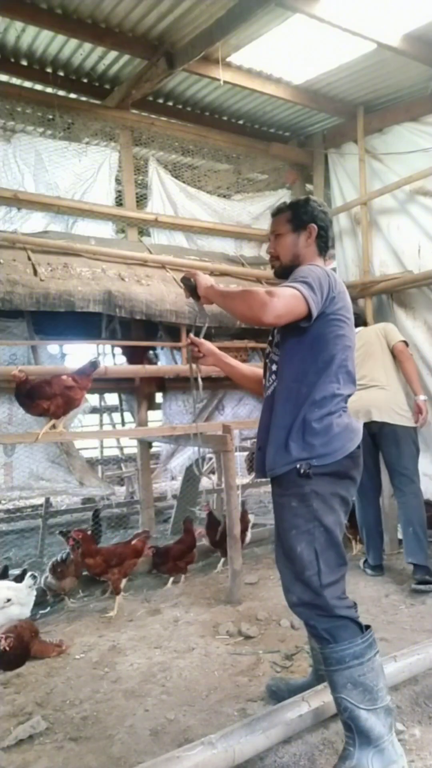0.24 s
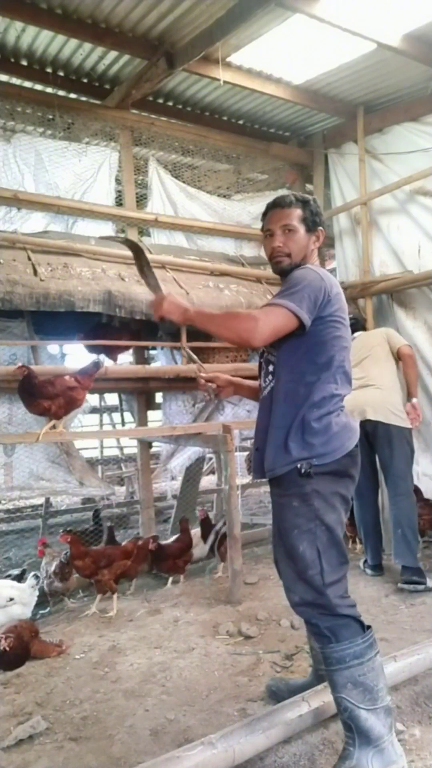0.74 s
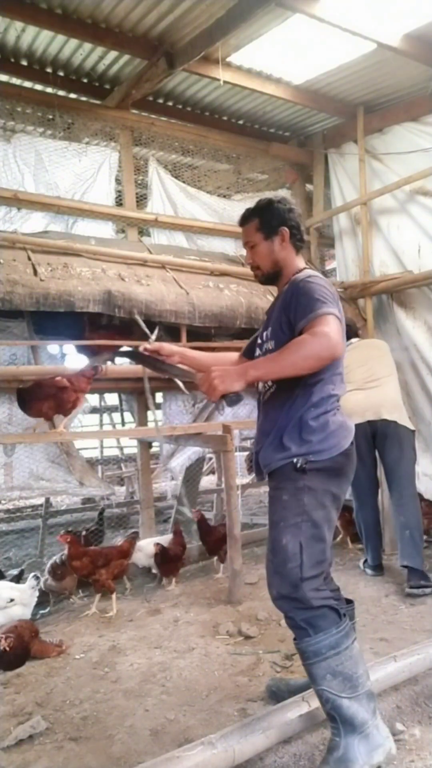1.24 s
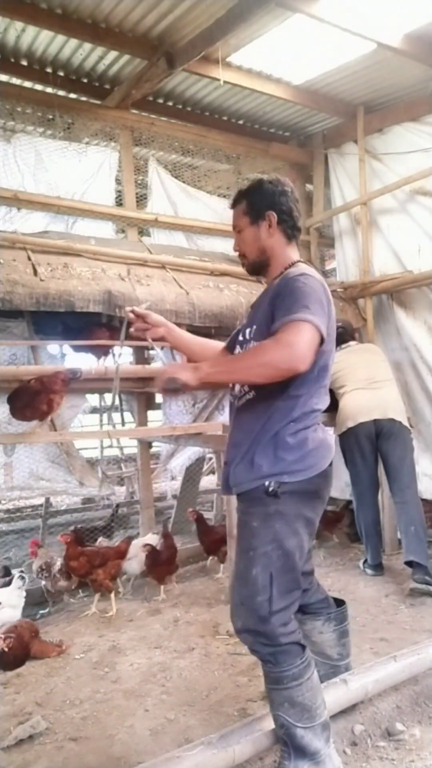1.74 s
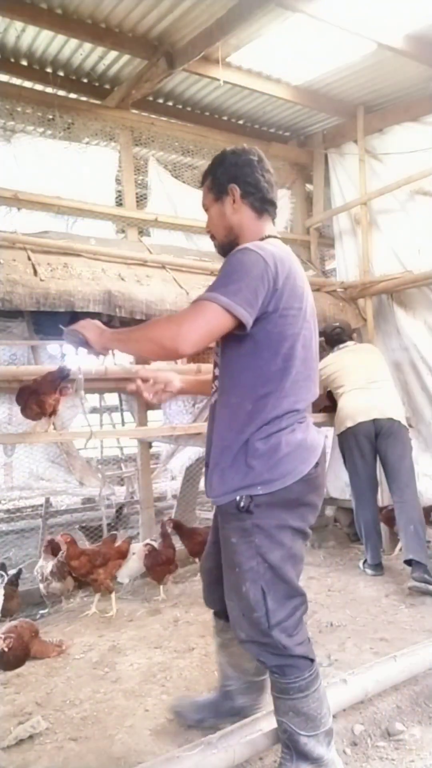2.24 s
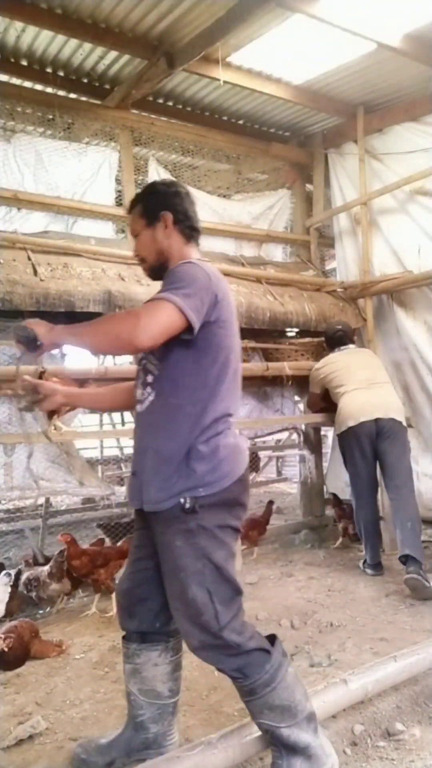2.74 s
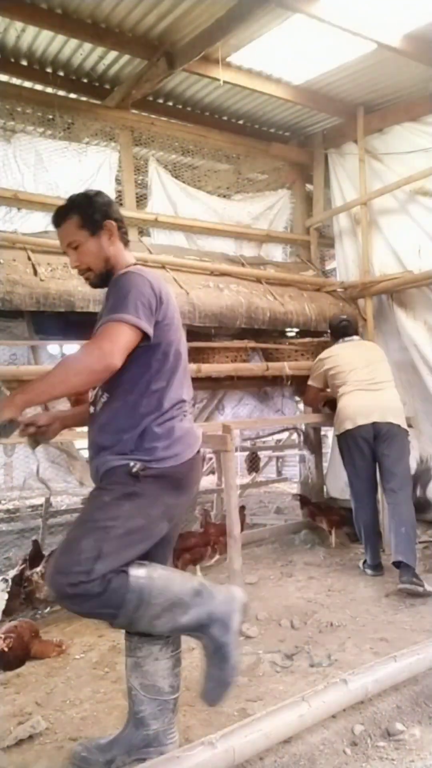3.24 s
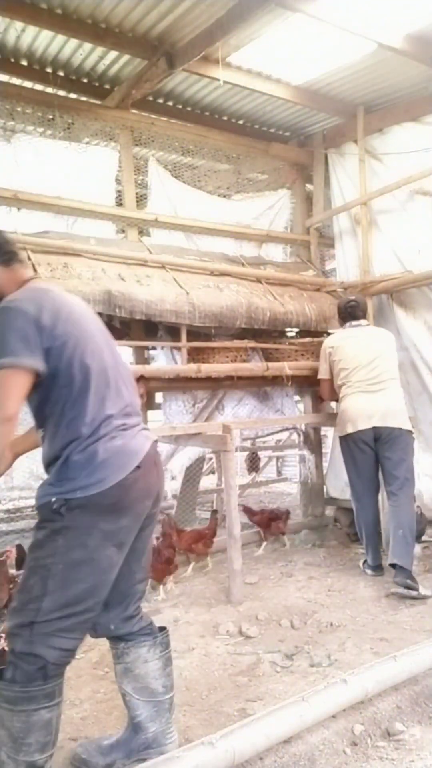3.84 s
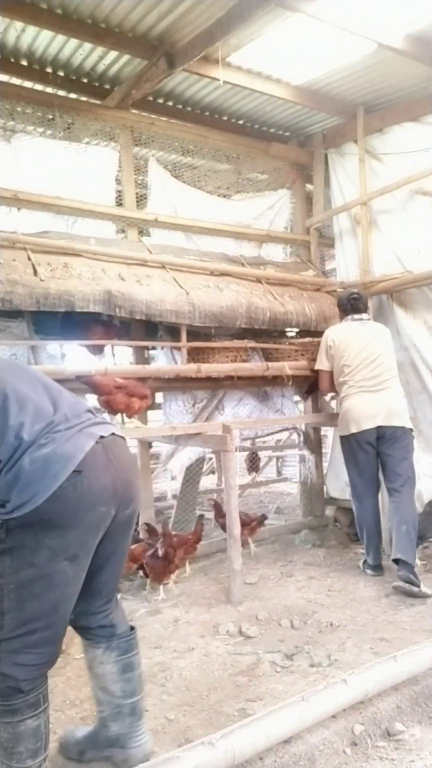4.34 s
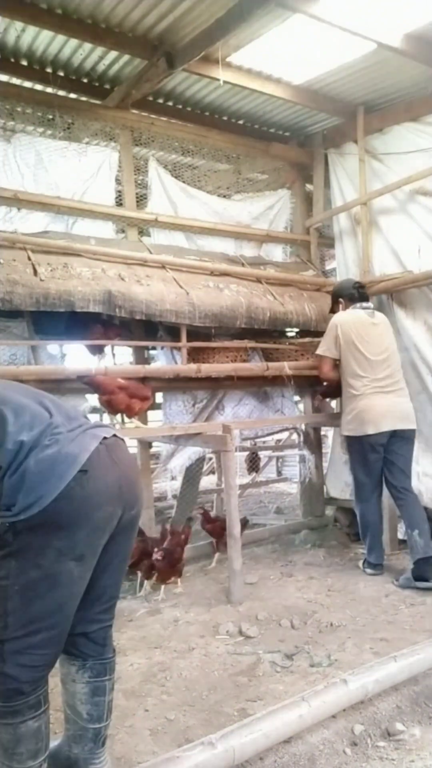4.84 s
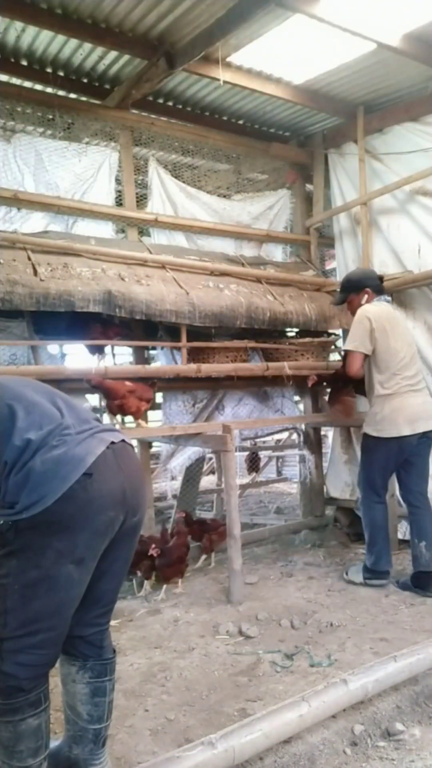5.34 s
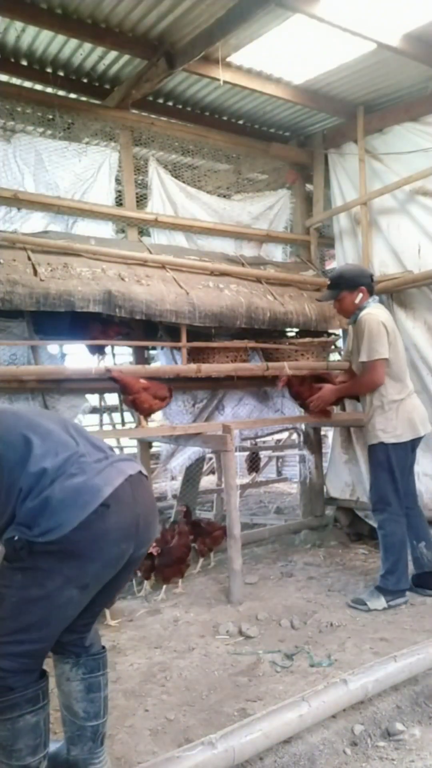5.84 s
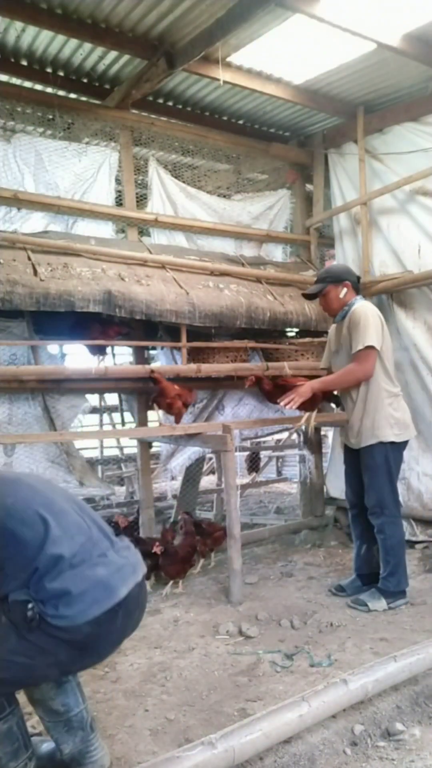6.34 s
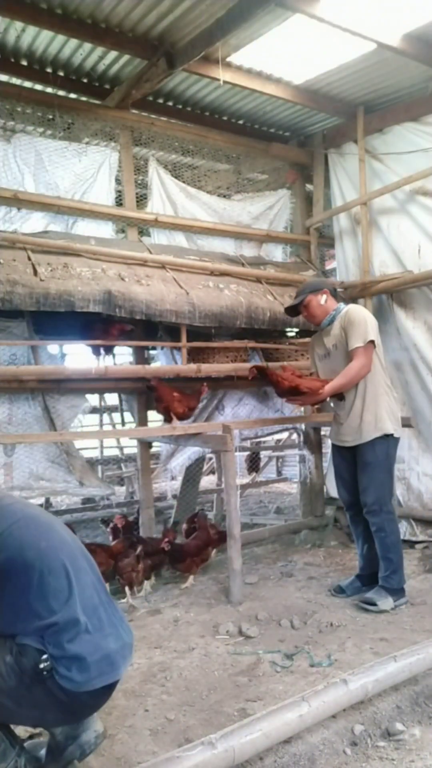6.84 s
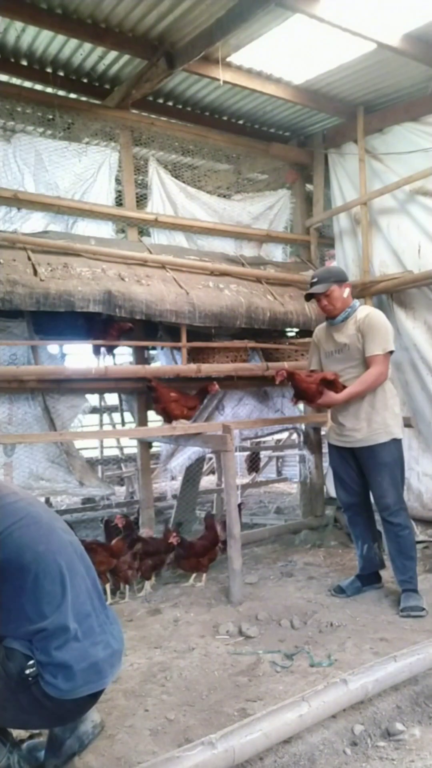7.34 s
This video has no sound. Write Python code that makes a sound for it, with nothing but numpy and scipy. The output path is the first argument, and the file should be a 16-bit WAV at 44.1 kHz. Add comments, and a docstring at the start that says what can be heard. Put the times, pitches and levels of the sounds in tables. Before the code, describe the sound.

A phone inside a small sheet-roofed chicken pen picks up a brief rustle and mixed low clucks. A held hen suddenly gives a rattling, rising squawk and a quick run of raspy cries, while wings and boots knock, slap and scuffle in dry litter. She follows with several clearer, strained calls, then calms as the flock clucks gently with tiny high peeps.

```python
"""Close in a bamboo hen shed under a sheet roof, on a phone: still air, litter rustling, the flock clucking,
with thin whines and chick peeps. From 2 s one caught hen squawks, hoarse at first, amid knocks of wings and
boots, slaps, rustle and scuffling; from 3.3 s she calls more clearly, and after 5.4 s she and the flock cluck on.
Voices are pulses and breath through throat and beak, whines and peeps wavering tones, blows decaying tones
and noise, air and litter coloured noise; the voices and blows also ring in the shed."""
import sys
import numpy as np
from scipy import signal
from scipy.fft import rfft, irfft, next_fast_len
from scipy.io import wavfile
from scipy.ndimage import map_coordinates

SR = 44100
rng = np.random.default_rng(int(sys.argv[2]) if len(sys.argv) > 2 else 0)


def waveform_to_disk(signal):
    """Save audio, clipped to [-1, 1], as 16-bit WAV at the path in sys.argv[1]."""
    frames = np.transpose(np.atleast_2d(signal))
    scaled = np.clip(frames, -1, 1) * 32767
    samples = np.round(scaled).astype(np.int16)
    wavfile.write(sys.argv[1], SR, samples)


N = 334278

# spectrum of dry leaves, twigs and litter: f/Hz, level/dB
LEAF_SPECTRUM = [(880, -32), (1500, 1), (3090, 4.5), (6690, 6.5), (16000, 0.5)]
# spectrum of dull blows and scuffling: f/Hz, level/dB
RUMBLE_SPECTRUM = [(29, -48), (50, -9), (84, -5), (161, -6), (450, -5), (580, -4), (990, -120)]
# throat response with the beak nearly shut: f/Hz, level/dB
SHUT_THROAT = [(250, -35.5), (420, -7), (700, -1), (1300, -5), (1800, -11), (2400, -27), (3500, -36.5),
               (6000, -69)]


def amp(db):
    """Amplitude factor of a level in dB."""
    return 10 ** (np.asarray(db) / 20)


def unit(x):
    """Scales to rms 1."""
    return x / np.sqrt(np.mean(x ** 2) + 1e-20)


def along(points, hz):
    """Reads (f/Hz, value) points on a log frequency axis."""
    f, v = np.transpose(points)
    return np.interp(np.log(hz + 1), np.log(f + 1), v)


def span(rows):
    """Start time, and one value per sample for each column after the time."""
    s, *cols = np.transpose(rows)
    t = np.arange(s[0], s[-1], 1 / SR)
    return s[0], [np.interp(t, s, c) for c in cols]


def add(track, s, x):
    """Mixes x into the track at s seconds."""
    part = track[round(s * SR):][:len(x)]
    part += x[:len(part)]


def faded(x, fade_s=0.003):
    """Soft ends, so that nothing clicks."""
    t = np.arange(len(x)) / SR
    return x * np.clip(np.minimum(t, t[::-1]) / fade_s, 0, 1)


def wobble(size, rate):
    """A smooth random curve through rate knots a second."""
    knots = rng.standard_normal(int(size * rate / SR) + 4)
    return map_coordinates(knots, [np.arange(size) * rate / SR])


def filtered(x, response):
    """Multiplies the spectrum of x by a response, a function of frequency in Hz."""
    m = next_fast_len(x.shape[-1] + 4096)  # room for the filter to ring
    spectrum = rfft(x, m) * response(np.fft.rfftfreq(m, 1 / SR))
    return irfft(spectrum, m)[..., :x.shape[-1]]


def noise(spectrum, size):
    """Coloured noise of rms 1."""
    return unit(filtered(rng.standard_normal(size), lambda hz: amp(along(spectrum, hz))))


def shed_noise():
    """One channel of still air, a slowly wavering noise, with litter rustling in random grains over it."""
    # still air of the shed: f/Hz, level/dB
    air_spectrum = [(300, -37), (1500, -11.5), (6300, -15.5), (16000, -26)]
    # passages of rustle, one list each: t/s, level/dB
    rustle = [
        [(0, -45), (.2, -45.5), (.42, -40.5), (.475, -32), (.68, -92)],
        [(2.4, -77), (2.75, -37), (3.05, -31.5), (3.3, -32.5), (3.6, -56)],
    ]
    out = amp(-55.5 + 2.5 * wobble(N, 7)) * noise(air_spectrum, N)
    for rows in rustle:
        s, (db,) = span(rows)
        size = len(db)
        grains = amp(4.5 * wobble(size, 40) + 3 * wobble(size, 400))
        litter = unit(grains * noise(LEAF_SPECTRUM, size))
        add(out, s, faded(amp(db) * litter, 0.0014))
    return out


def scuffle():
    """Feet and wings as a low lumpy rumble, and the hens at the far end as a soft noise of throats."""
    # t/s, level of feet and wings/dB, level of the far flock/dB
    levels = [(0, -66, -65), (2.3, -64, -56), (2.7, -42, -41.5), (3.3, -50.5, -47), (3.95, -69, -57),
              (7.58, -61.5, -62.5)]
    s, (rumble_db, flock_db) = span(levels)
    size, out = len(rumble_db), np.zeros(N)
    rumble_db = rumble_db + 3.5 * wobble(size, 12)
    flock_db = flock_db + 3.5 * wobble(size, 8) + 4 * wobble(size, 30)
    add(out, s, amp(rumble_db) * noise(RUMBLE_SPECTRUM, size))
    add(out, s, amp(flock_db) * noise(SHUT_THROAT, size))
    return out


def knocks():
    """Dull thumps of tone and rumble, and slaps: a bright crack over a short ring of hollow cane."""
    # knocks on perch and ground: t/s, level/dB, f/Hz
    thumps = [(2.395, -45.5, 163.7), (2.579, -35, 160), (2.686, -31.5, 338), (3.235, -29, 247),
              (3.272, -28, 214), (3.392, -36.5, 161.9), (3.822, -41, 166)]
    # slaps of twigs and wings: t/s, level/dB, cane against crack/dB, t60 of the crack's tail/s, cane f/Hz
    slaps = [(0.773, -37.5, 2, 0.259, 1005), (2.7008, -26, 10, 0.13, 745), (3.02, -21, -25, 0.04, 1187),
             (3.1833, -39.5, 31.5, 0.38, 1365), (3.213, -41.5, 28, .05, 1007),
             (3.8222, -31, 7.5, 0.15, 683)]
    out, t = np.zeros(N), np.arange(SR // 5) / SR
    for s, db, hz in thumps:
        push = np.sin(2 * np.pi * hz * t) + 0.9 * noise(RUMBLE_SPECTRUM, len(t))
        onset = 1 - np.exp(-t / 0.0011)
        add(out, s, amp(db - 2.5 - 60 * t / 0.18) * onset * push)
    for s, db, cane_db, t60, cane_hz in slaps:
        decay = amp(3.5 - 60 * t / t60) + amp(-60 * t / 0.013)  # a tail and a quick snap
        crack = decay * (1 - np.exp(-t / 0.0012)) * noise(LEAF_SPECTRUM, len(t))
        cane = amp(-60 * t / 0.073) * np.sin(2 * np.pi * cane_hz * t)
        cane = cane * (1 + 0.5 * wobble(len(t), 220)) * (1 - np.exp(-t / 0.00022))
        add(out, s, amp(db - 5) * (crack + amp(cane_db) * cane))
    return out


def whistle(length_s, start_hz, end_hz, db, arch, waver_hz):
    """A wavering near-pure tone with a faint octave, its pitch arching in the middle."""
    octave_db = -24
    size = round(length_s * SR)
    bend = 1 + arch * np.sin(np.linspace(0, np.pi, size))
    pitch_hz = bend * np.linspace(start_hz, end_hz, size) + waver_hz * wobble(size, 93)
    turn = 2 * np.pi * np.cumsum(pitch_hz) / SR
    tone = np.sin(turn) + amp(octave_db) * np.sin(2 * turn)
    return faded(np.sqrt(2) * amp(db + 2.4 * wobble(size, 46.5)) * tone, 0.021)


def beak(spectrum, beak_hz, beak_db, width_hz):
    """A throat response with one resonance lifted."""
    return lambda hz: amp(along(spectrum, hz) + beak_db / (1 + ((hz - beak_hz) / width_hz) ** 2))


def voice(pitch_hz, db, treble_db, rough, shut, wide, opening):
    """Syrinx pulses through throat and beak; roughness unsettles pitch and size, and air hisses once a cycle."""
    # treble of the voice: f/Hz, level/dB
    treble_spectrum = [(1470, -17), (2500, -4.5), (3200, -3), (3700, -6), (4170, -4), (4690, -14),
                       (7020, -4.5), (11300, -14), (16000, -27)]
    doubling = 3.5  # how far strong and weak pulses alternate at full roughness
    size, rough = len(db), np.clip(rough, 0, 1)
    jitter = 0.01066 * wobble(size, 29.5) + 0.057 * rough * wobble(size, 263.7)
    turn = 2 * np.pi * np.cumsum(pitch_hz * (1 + jitter)) / SR

    # the restless throat lifts each overtone in turn
    k = np.arange(1, 21)[:, None]
    step = 1200  # samples between knots
    knots = rng.standard_normal((len(k), size // step + 2))
    at = np.arange(size) / step
    lifts_db = [5 * np.interp(at, np.arange(len(row)), row) for row in knots]
    overtones = np.cos(k * turn + 0.3 * k * k)  # spread phases: a drawn-out pulse
    pulses = unit((amp(lifts_db) * overtones).sum(axis=0))
    pulses = pulses * amp(4 * rough * wobble(size, 110))
    pulses = pulses * (1 + doubling * rough ** 2 * np.cos(turn / 2))
    air = rng.standard_normal(size) * (1 + 0.98 * np.cos(turn)) * amp(3.48 * wobble(size, 93.14))

    def mix(air_share, tract):
        """Pulses and air through one tract, shared by power."""
        tone, hiss = unit(filtered(pulses, tract)), unit(filtered(air, tract))
        return np.sqrt(1 - air_share) * tone + np.sqrt(air_share) * hiss

    body = (1 - opening) * mix(rough ** 2, shut) + opening * mix(rough ** 2, wide)
    treble = mix(np.clip(0.11 + 1.53 * rough, 0, 1), lambda hz: amp(along(treble_spectrum, hz)))
    return faded(amp(db) * (body + amp(treble_db) * treble))


def cluck(db, pitch_hz, beak_hz, swell_s, treble_db, rough):
    """One breath push: it swells and glides up, sags in pitch, roughens and dies."""
    scoop = 0.09  # share of the pitch by which the glide starts low
    t = np.arange(1, SR // 6) / SR
    u = t / max(swell_s, 0.008)
    level_db = db + 12 * (np.log(u) + 1 - u)  # peaks at u = 1
    glide_hz = pitch_hz * (1.01 - 0.412 * t - scoop * np.exp(-2 * u))
    throat = beak(SHUT_THROAT, beak_hz, 10.5, 210)
    return voice(glide_hz, level_db, treble_db, rough + 3.77 * t, throat, throat, opening=1)


def flock():
    """Nearer hens and chicks, with some soft clucks of the caught hen: breathy clucks, whistled whines and peeps."""
    # clucks: t/s, level/dB, pitch f/Hz, beak resonance f/Hz, swell/s, treble against body/dB, roughness (0-1)
    clucks = [(0.376, -44.5, 583, 1220, 0.0091, -4.5, 0.8), (0.538, -41, 306, 970, 0.0067, -25.5, 0.27),
              (0.685, -30, 453, 1010, 0.013, -16, 0.17), (0.875, -37, 574, 870, 0.01157, -28, 0.34),
              (0.936, -44, 514, 1040, 0.011, -12.5, 0.31), (1.135, -39, 631, 697, 0.013, -25, 0.77),
              (1.169, -45, 580, 1200, 0.0067, -20, 0.36), (1.251, -28, 462.5, 1400, 0.01007, -21.5, 0.37),
              (1.313, -34.5, 567, 1014, 0.023, -21.5, 0.3), (1.44, -28.5, 649.6, 1004, 0.038, -25, 0.44),
              (1.654, -31.5, 390, 910, 0.034, -28.5, 0.56), (1.744, -25.5, 524, 1150, 0.016, -23, 0.26),
              (1.859, -23.5, 687, 1462, 0.016, -18.5, 0.39), (2.432, -32, 476, 903.5, 0.024, -25.5, 0.7),
              (5.493, -32.5, 698, 1570, 0.023, -13.5, 0.52), (5.655, -39.5, 337, 880, 0.0127, -31, .5),
              (5.765, -31.5, 715.2, 1425, 0.022, -15.5, 0.31),
              (5.867, -28, 668.4, 1480, 0.025, -17.5, 0.33), (5.94, -35.5, 673, 1380, 0.029, -18, 0.54),
              (6.142, -33.5, 606, 950, 0.018, -26.5, 0.55), (6.402, -33.5, 402.6, 800, 0.026, -19.5, 0.28),
              (6.55, -43, 421.7, 1050, 0.027, -34.5, 0.5), (6.653, -27.5, 413.4, 1270, 0.01806, -23, 0.18),
              (6.773, -34.5, 400.4, 1090, 0.017, -26, 0.34), (6.919, -45, 537, 835, 0.014, -38.5, 0.73),
              (7.064, -33.5, 681, 1300, 0.02673, -24, 0.51), (7.19, -31.5, 659, 1344, 0.0169, -25.5, 0.37),
              (7.48, -31.5, 398, 1247, 0.021, -22.5, 0.37)]
    # soft whines and coos of single hens: t/s, length/s, start f/Hz, end f/Hz, level/dB, arch (share of pitch)
    whines = [(0.964, 0.037, 490, 353, -50, .04), (5.424, 0.096, 1069, 1065, -39.5, 0.066),
              (5.682, 0.057, 925.5, 1003, -44, 0.033), (6.453, 0.11, 1004, 1003, -48, 0.0214),
              (7.351, 0.15, 1015, 960, -46, .01), (7.33, .11, 799, 660, -45, .6)]
    # chick peeps: t/s, length/s, start f/Hz, end f/Hz, level/dB
    peeps = [(0.739, 0.053, 3450, 3370, -59), (0.987, 0.08, 3366, 3475, -56),
             (1.285, 0.089, 3410, 3270, -57), (6.025, 0.069, 3430, 3420, -55.5),
             (6.283, 0.119, 3470, 3436, -53), (6.609, 0.1, 3480, 3366, -50)]
    out = np.zeros(N)
    for s, *row in clucks:
        add(out, s, cluck(*row))
    for s, *row in whines:
        add(out, s, whistle(*row, waver_hz=42))
    for s, *row in peeps:
        add(out, s, whistle(*row, arch=0.0175, waver_hz=29))
    return out


def squawk(swell_s, fall_s, onset_db, peak_db, end_db, onset_hz, peak_hz, rough):
    """Pitch and level climb together to a peak, then drop; hoarse at both ends."""
    attack_s, attack_db = 0.031, -6  # the voice starts this far under the onset level
    kick_s, kick_db = 0.027, 3  # the first push overshoots and settles
    swell_curve = 1.77  # over 1: the level climbs most near the peak
    fall_curve, sag = 0.453, 0.08  # under 1: the level drops most at first; share of the peak pitch lost
    hoarse_onset, clears_s, hoarse_fall = 0.36, 0.0534, 0.3  # roughness added at the start, its decay, at the end
    t = np.arange(0, swell_s + fall_s, 1 / SR)
    swell, fall = np.clip(t / swell_s, 0, 1), np.clip((t - swell_s) / fall_s, 0, 1)
    attack = np.clip(1 - t / attack_s, 0, 1)
    kick = np.exp(-((t - attack_s) / kick_s) ** 2)
    db = onset_db + (peak_db - onset_db) * swell ** swell_curve + (end_db - peak_db) * fall ** fall_curve
    db = db + attack_db * attack + kick_db * kick
    rise = np.sin(swell * np.pi / 2) ** 2
    pitch_hz = onset_hz + (peak_hz - onset_hz) * rise - sag * peak_hz * fall
    return pitch_hz, db, rough + hoarse_onset * np.exp(-t / clears_s) + hoarse_fall * fall


def hen_voice(pitch_hz, db, treble_db, rough, shuts, ring_db):
    """The harder she calls, the wider the beak and the higher its resonance; a rasp closes it part-way."""
    # her throat with the beak wide: f/Hz, level/dB
    wide_throat = [(300, -35.5), (520, -5.5), (1050, -4.5), (1450, 5), (1700, 0.5), (2100, -10.5),
                   (2800, -26.5), (5000, -93)]
    opening = np.clip(2.01 + (db - db.max()) / 11 - shuts * rough, 0, 1)
    shut = beak(SHUT_THROAT, 943, 16.2, 156)
    wide = beak(wide_throat, 1325, ring_db, 114)  # a strained throat rings more sharply
    return voice(pitch_hz, db, treble_db, rough, shut, wide, opening)


def caught_hen():
    """Hoarse squawks by rule, their treble growing with effort; clearer calls along their curves."""
    # squawks: t/s, swell/s, fall/s, onset, peak and end level/dB, onset and peak f/Hz,
    # base roughness (0-1), base treble against body/dB
    squawks = [(2.043, 0.275, 0.062, -35, -21.5, -42, 487, 631, 0.48, -18),
               (2.478, 0.04, 0.0466, -29.5, -22.5, -27, 575.6, 633.4, 0.35, -16.5),
               (2.574, 0.059, 0.058, -30.5, -22, -35.5, 602, 626.6, 0.34, -14),
               (2.69, 0.0526, 0.12, -39.5, -20.5, -38, 400, 600, 0.13, -14),
               (2.896, 0.053, 0.0578, -27.5, -26, -36, 550.9, 619, 0.17, -10),
               (3.11, 0.07, 0.053, -39, -24, -36.5, 522.4, 604.4, 0.15, -4.5)]
    # clearer calls, one curve each: t/s, level/dB, pitch f/Hz, roughness (0-1), treble against body/dB
    clear_calls = [
        [(3.338, -43.5, 450, 0.4, -7), (3.371, -22.5, 525, 0, -9), (3.4, -31, 521.6, 0.14, -11),
         (3.43, -34, 514.7, 0.77, -11.5), (3.48, -34, 504.3, 0.1, -6.5), (3.515, -46, 490, 0.5, -20)],
        [(3.635, -48, 448, 0.57, -4), (3.658, -27.5, 501, 0.06, -15), (3.68, -24, 514, 0.07, -15.5),
         (3.708, -26.5, 513.5, 0.02, -24), (3.75, -40.5, 480, 0.6, -1.5)],
        [(3.862, -39.5, 467.3, 0.75, -11), (3.882, -23.5, 480.4, 0.24, -20), (3.915, -32.5, 513.7, 0.04, -18),
         (3.955, -29, 505.7, 0.44, -9), (3.99, -27, 477.8, 0.09, -12.5), (4.035, -25, 489.4, 0.12, -15.5),
         (4.09, -25.5, 520.7, 0.01, -5.5), (4.135, -21, 526, 0.09, -11.5), (4.16, -26.5, 468.7, 0.38, -13.5)],
        [(4.31, -35.5, 459, 0.5, -14), (4.344, -26.5, 487.6, 0.01, -10.5), (4.362, -34.5, 487, 0, -4.5),
         (4.4, -31.5, 489, 0, -3.5), (4.45, -23.5, 507, 0.04, -8.5), (4.468, -28.5, 469, 0.25, -14),
         (4.5, -50, 453, 0.3, -15)],
        [(4.603, -39, 482.5, 0.55, -12), (4.615, -31.5, 489, 0.48, -6), (4.66, -27.5, 480.4, 0.04, -3.5),
         (4.694, -27, 516.3, 0, -5), (4.75, -22, 550.4, 0, -5.5), (4.77, -25, 548, 0.44, -12),
         (4.808, -40, 485, 0.4, -9)],
        [(4.985, -47, 426.6, 0.61, -6), (5.008, -28, 455.7, 0.06, -8), (5.05, -37, 470, .55, -9),
         (5.09, -32, 520, .5, -12), (5.165, -33, 500, .5, -9), (5.2, -31, 466, 0.2, -3.5),
         (5.25, -37.5, 407.7, 0.2, -9.5), (5.275, -36.5, 397, 0.3, -25.5)],
    ]
    growl_s, growl_end_s, growl_hz, growl_db = 2.073, 2.23, 49, 5.5  # the first squawk rattles
    out = np.zeros(N)
    for s, *shape, treble_db in squawks:
        pitch_hz, db, rough = squawk(*shape)
        t = s + np.arange(len(db)) / SR - growl_s
        growling = (t > -0.01) * (t < growl_end_s - growl_s)  # begins 10 ms early
        rattle_db = growl_db * np.cos(2 * np.pi * growl_hz * t) * growling
        # the rattle is taken off the treble here, so that only the body flutters
        effort_db = treble_db - rattle_db + 0.13 * (db - db.max())
        call = hen_voice(pitch_hz, db, effort_db, rough, shuts=0.95, ring_db=6)
        add(out, s, call * amp(rattle_db))
    for rows in clear_calls:
        s, (db, pitch_hz, rough, treble_db) = span(rows)
        add(out, s, hen_voice(pitch_hz, db, treble_db, rough, shuts=0.4, ring_db=0))
    return out


def shed(x):
    """Each frequency dies at its own speed; three answers take turns quickly, so that the tail stays diffuse."""
    # decay of the shed: f/Hz, t60/s
    decay_times = [(300, 0.1755), (1500, 0.25), (8000, 0.23)]
    bursts = rng.standard_normal((3, 2, SR // 2))  # three answers, two channels
    hz, t, z = signal.stft(bursts, SR, nperseg=256)
    decay = amp(-60 * t / along(decay_times, hz)[:, None])
    tails = signal.istft(z * decay, SR, nperseg=256)[1]
    shift = np.arange(3)[:, None] / 3
    turns = np.cos(np.pi * (35 * np.arange(N) / SR + shift)) ** 2  # 35 rounds a second
    wet = np.zeros((2, N))
    for turn, tail in zip(turns, tails):
        sent = np.pad(x * turn, (300, 0))[None]  # about 7 ms late
        wet += signal.fftconvolve(sent, tail / np.linalg.norm(tail[0]), axes=1)[:, :N]
    return wet


def ports(x):
    """Two microphone ports hear a source at different levels and, above the bass, different phases."""
    # lean to one side: f/Hz, left minus right level/dB
    lean = [(100, 2), (15000, 5)]
    half = np.array([[0.5], [-0.5]])

    def response(hz):
        phase = 1.46 * hz ** 2 / (hz ** 2 + 700 ** 2)  # radians between the ports
        return amp(half * along(lean, hz)) * np.exp(-1j * half * phase)

    return filtered(np.array([x, x]), response)


def scene():
    """Hen, flock and blows, direct and through the shed, over air and rustle spread across both ports."""
    hen, others, blows = caught_hen(), flock(), knocks() + scuffle()
    wet = shed(amp(-2.5) * hen + amp(-3.5) * others + amp(-6) * blows)
    common = shed_noise()
    spread = 0.12 * common + 0.39 * np.array([shed_noise(), shed_noise()])
    return ports(hen + others + blows) + wet + spread * amp([[1.5], [-1.5]])  # air louder on the left


def record(dry):
    """The phone's microphones lose the deep bass and keep nothing above their band limit."""
    top_hz = 15900
    return filtered(dry, lambda hz: (hz < top_hz) / (1 + (70 / (hz + 1)) ** 3))


dry = scene()
out = record(dry)
waveform_to_disk(out)
```